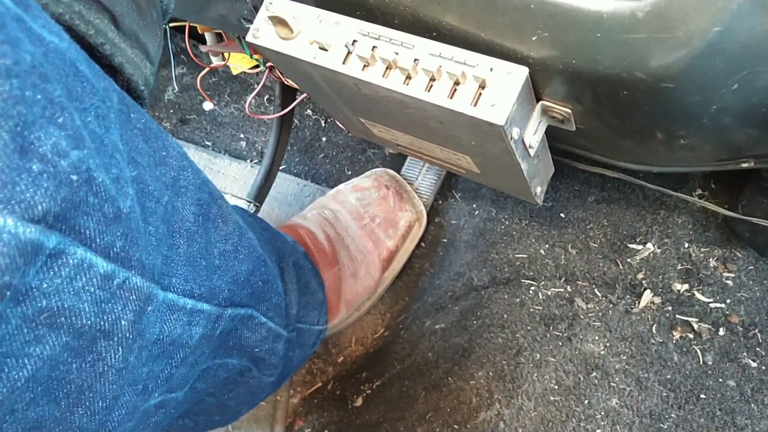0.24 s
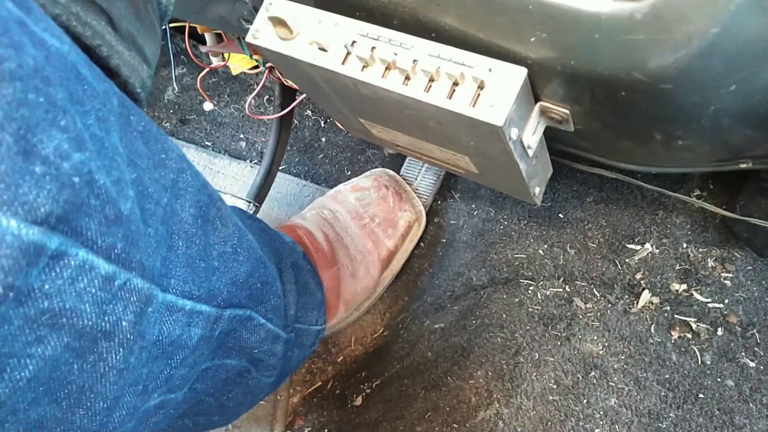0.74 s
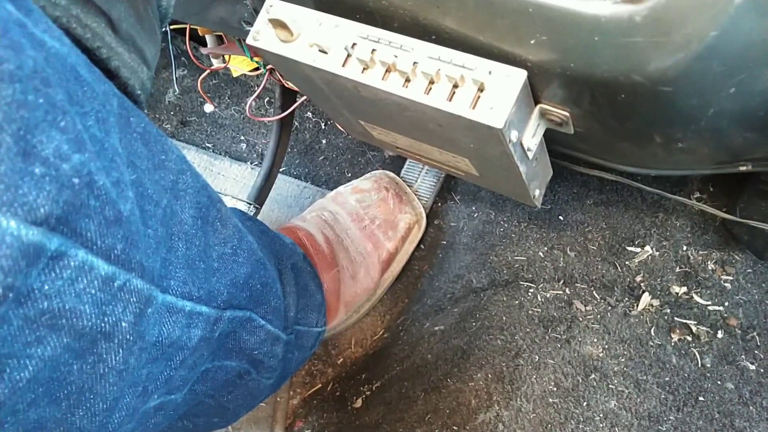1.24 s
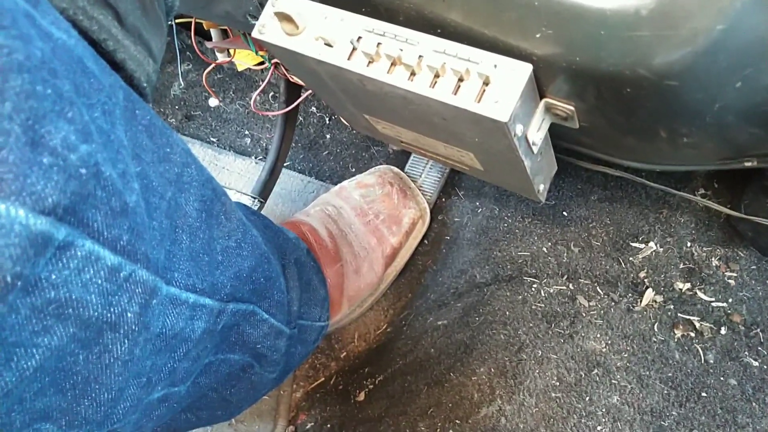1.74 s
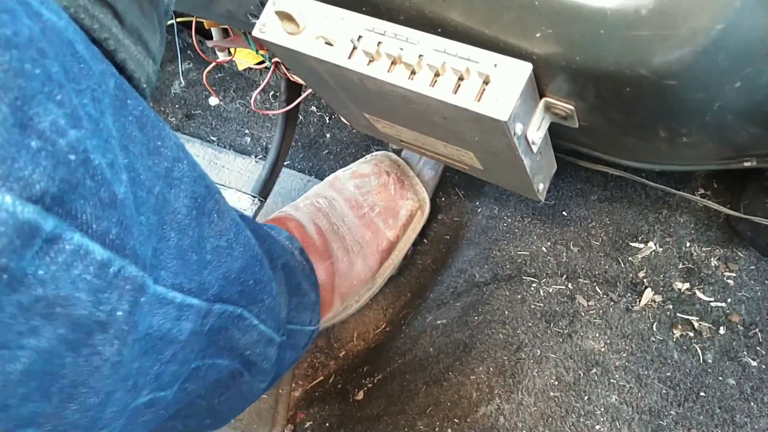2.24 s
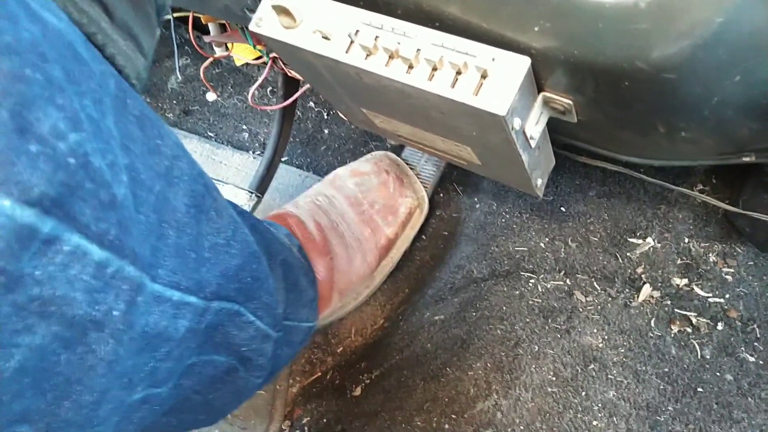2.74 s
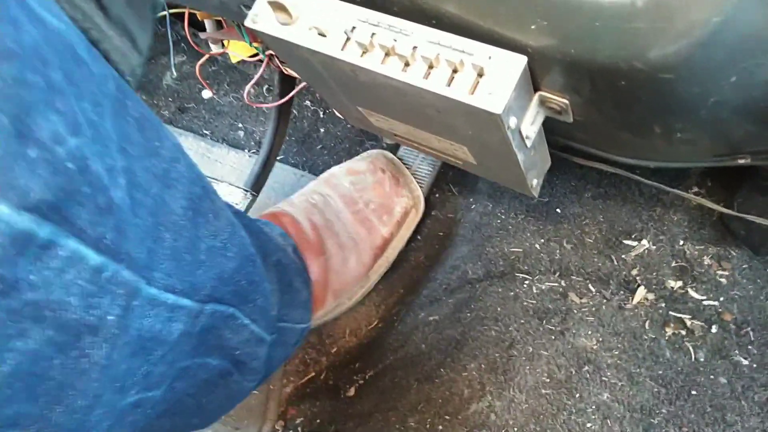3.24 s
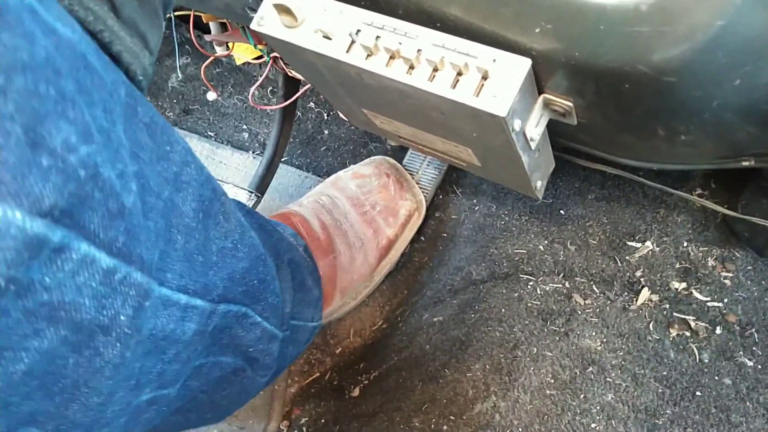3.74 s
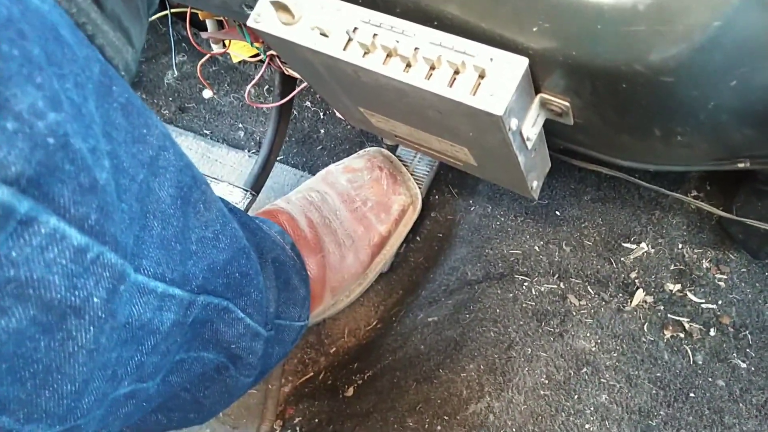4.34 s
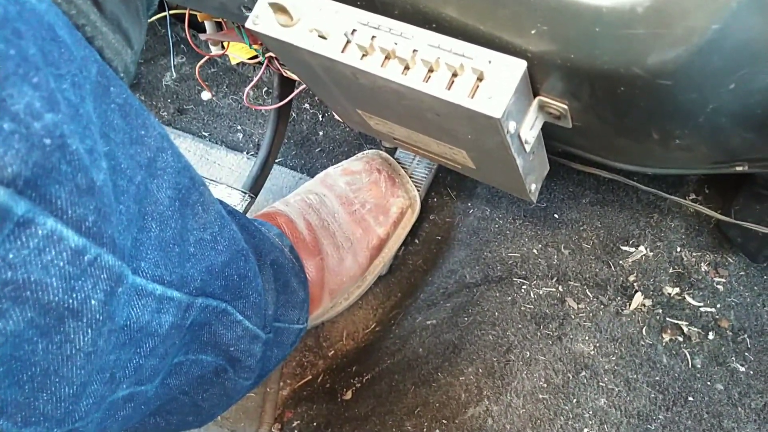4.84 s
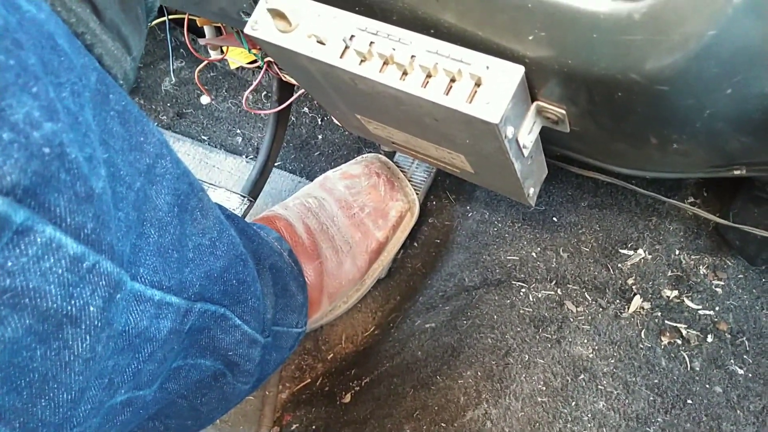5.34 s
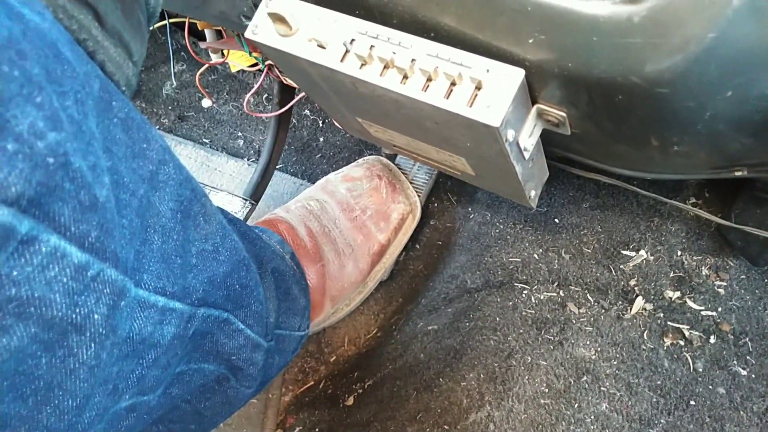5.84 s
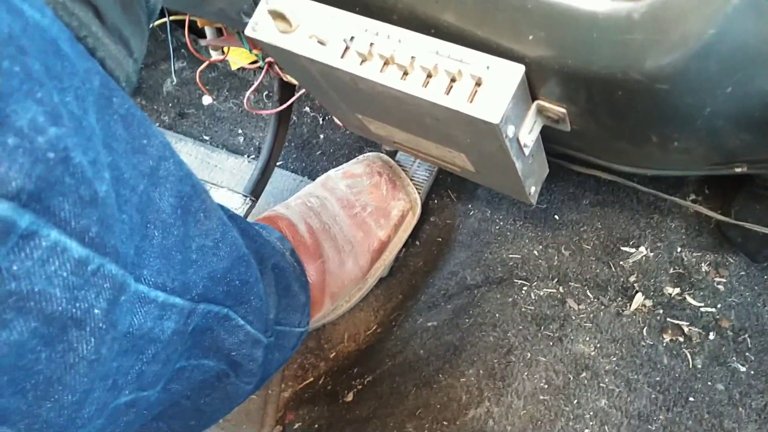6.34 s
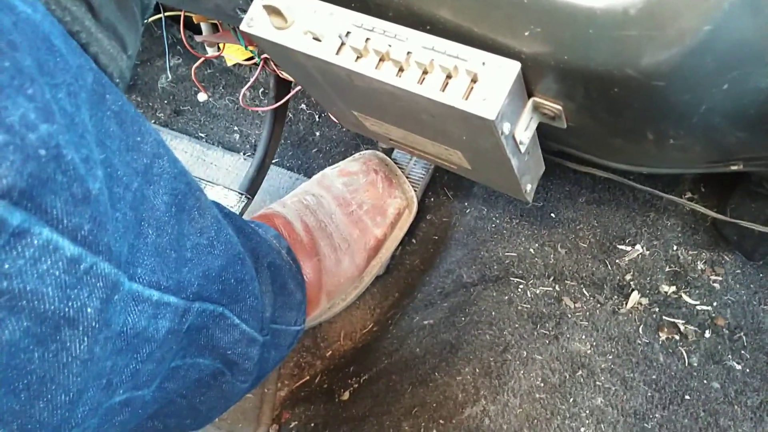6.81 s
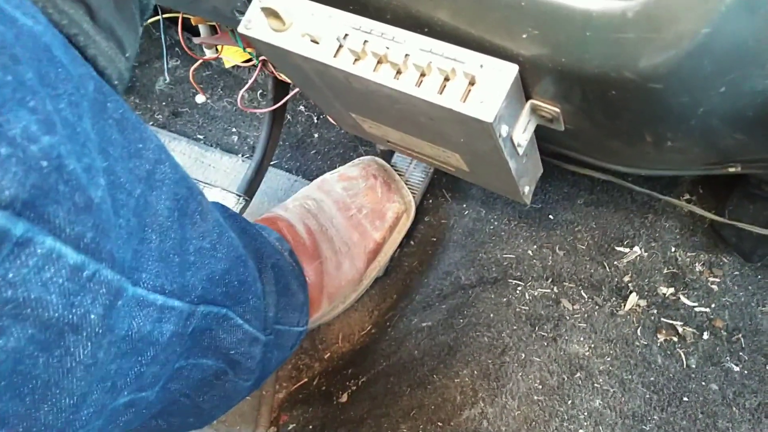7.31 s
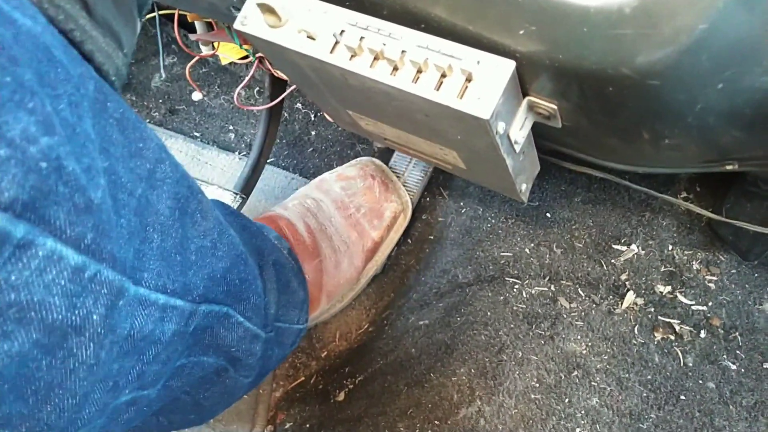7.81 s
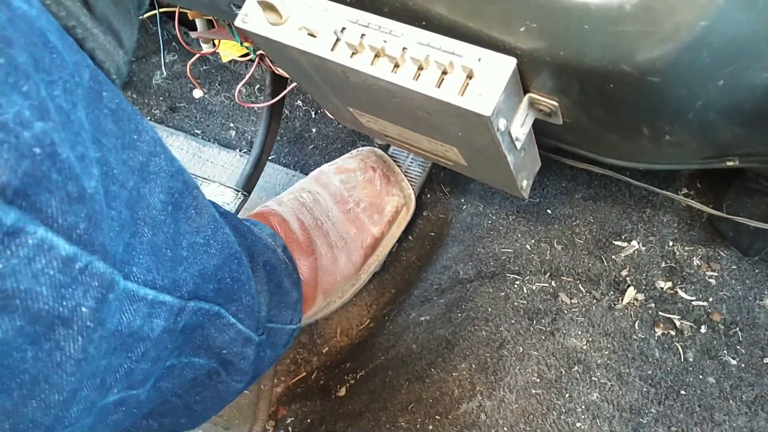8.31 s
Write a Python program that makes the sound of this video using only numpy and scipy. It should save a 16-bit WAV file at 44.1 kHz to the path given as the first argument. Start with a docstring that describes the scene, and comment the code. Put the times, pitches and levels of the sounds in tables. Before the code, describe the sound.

Dry, close sound inside a truck cab, with faint low hum and air hiss throughout. From 0 to about 2 seconds a starter grinds a cold engine: rough metallic whine and rasp, jingling loose parts, irregular surges and slams, deep wavering boom through the cab. It lets go near 2.1. Until 3.9, a boot pumps the pedal with dull, soft floor knocks, strongest around 2.85, 3.1 and 3.4, with tiny key ticks and linkage rustles. A quiet gap follows. At 4.58 the solenoid clicks sharply; at 4.7 the pinion clanks into mesh and grinding resumes, lumpy and labouring. A heavy kick lands at 5.8. From 6.05 to 7.5 the engine coughs in irregular muffled low thumps, the grind brighter and harsher. Around 7.4 the starter releases, its thin high hiss pulsing slower and fading while the boom dies. A faint knock at 8.2, then near quiet to 8.5.

```python
"""Cold engine cranked, heard in a truck cab

The starter grinds a cold engine over and lets go, a boot pumps the pedal, the solenoid clicks and the
starter grinds again; the engine coughs and the starter spins down. Gear: noise in housing resonances.
Cab boom: wavering tones and resonant noise. Knocks, coughs, clicks: struck decaying modes.
Hum, air hiss, scrapes, firewall drone: a tone and coloured noise.
"""
import sys
import numpy as np
from scipy import signal
from scipy.fft import rfft, irfft
from scipy.io import wavfile

SR = 44100
rng = np.random.default_rng(int(sys.argv[2]) if len(sys.argv) > 2 else 0)


def output_pcm(signal):
    """Save a mono or channel-first signal as 16-bit PCM at the path in sys.argv[1].

    Samples are clipped to [-1, 1] before scaling.
    """
    pcm = np.clip(np.atleast_2d(signal).T, -1, 1) * 32767
    wavfile.write(sys.argv[1], SR, np.round(pcm).astype(np.int16))


N = 377937

# Air hiss spectrum: f/Hz, relative density/dB
AIR_SPECTRUM = [(47, -22), (80, -6.5), (170, -25), (1020, -33.5), (1730, -31.5), (2690, -37), (4000, -39),
                (5700, -45.5), (15800, -43)]
AIR_DB = -47
HUM_HZ, HUM_DB = 58.4, -39.5

# Touching keys, onsets: t/s, nominal peak/dB
KEY_TICKS = [(2.242, -47), (3.075, -50), (3.097, -48), (3.57, -48)]
# Key modes: f/Hz, relative level/dB, t60/s
KEY_MODES = [(11700, 0, .07), (14300, -3, .03)]
# Pedal linkage rustles: t/s, level/dB, centre f/Hz
LINKAGE_RUSTLES = [(2.325, -50, 600), (2.57, -47, 560), (3.085, -46, 330), (3.22, -52, 800),
                   (3.295, -55, 3300), (3.515, -45, 440)]

# Floor pan knocks from pedal and shaking:
# t/s, nominal level/dB, upper ring re level/dB, nominal rattle re level/dB
FLOOR_KNOCKS = [(2.057, -29, -18, -11), (2.277, -26, -13, -12), (2.35, -22, -22, -32),
                (2.608, -24, -22, -30), (2.854, -17.5, -20, -23), (3.117, -18, -22, -27),
                (3.285, -29, -24, -22), (3.409, -13.5, -24, -29), (3.703, -23.5, -24, -28),
                (3.857, -24, -24, -23), (6.902, -20, -22, -23), (7.464, -28, -17, -8),
                (8.179, -29, -24, -24)]
# Floor pan, deep modes: f/Hz, relative level/dB, t60/s
PAN_LOW_MODES = [(124, -9, .07), (163, -3, .2), (184, 2, .25)]
# Floor pan, upper modes: f/Hz, relative level/dB, t60/s
PAN_HIGH_MODES = [(245, 12, .08), (305, 15, .06), (440, 7, .06), (555, 5, .09), (800, 2, .05)]
# Linkage rattle and sole scuff spectra: f/Hz, relative density/dB
RATTLE_SPECTRUM = [(300, -17.0), (600, 0.5), (2000, -1.5), (3500, -12.5), (6000, -21), (15000, -18)]
SCUFF_SPECTRUM = [(150, 15.5), (320, 5.0), (700, -9), (1800, -19)]
SCUFF_RE_KNOCK_DB, SCUFF_LEAD_S = -25, 0.042

# Key and solenoid clicks: t/s, nominal level/dB
SOLENOID_CLICKS = [(4.543, -31.5), (4.578, -13), (4.587, -21)]
# Solenoid modes: f/Hz, relative level/dB, t60/s
SOLENOID_MODES = [(520, -16, .1), (880, 0, .1), (1394, -4, .09), (2013, 2, .06), (2900, -4, .08),
                  (3170, 9, .055), (3400, -1, .06), (4000, -2, .06), (5070, -5, .06)]
# Solenoid scrape spectrum: f/Hz, relative density/dB
SOLENOID_SCRAPE_SPECTRUM = [(400, 7), (3000, 7.0), (7000, 3.0), (15000, -16)]
MESH_S, MESH_DB = 4.702, -16
# Ring gear modes: f/Hz, relative level/dB, t60/s
RING_GEAR_MODES = [(830, -7, .04), (1920, 0, .05), (2940, -5, .05)]

# Engine kicks against its mounts: t/s, nominal peak/dB
ENGINE_KICKS = [(1.235, -25), (4.704, -22.5), (5.798, -17), (6.962, -21)]
# Firewall modes: f/Hz, relative level/dB, t60/s
FIREWALL_MODES = [(243, 0, .09), (645, -15, .05)]
# Catching cylinders: t/s, nominal level/dB before the low-pass
CYLINDER_COUGHS = [(6.054, -21), (6.192, -7), (6.492, -13), (6.619, -10.5), (6.809, -5), (6.959, -17),
                   (7.102, -17), (7.39, -12), (7.479, -13)]
# Exhaust thump through the body: f/Hz, relative level/dB, t60/s
THUMP_MODES = [(52.3, -10.5, 0.19), (94.5, -10, 0.18), (136, -18, 0.099)]

# Cab shaking: t/s, low boom level/dB, upper boom level/dB
CAB_SHAKE = [(0, -25, -29), (0.4, -33.5, -28.5), (0.72, -29, -27), (0.85, -23, -36.5), (1.2, -32, -23.5),
             (1.97, -28, -28), (2.12, -33, -47), (2.5, -43, -44.5), (3, -37.5, -49), (3.9, -44, -46.5),
             (4.1, -68, -91), (4.69, -48, -32), (4.72, -30.5, -18.5), (5.6, -36, -35), (5.9, -23.5, -34),
             (6.2, -22, -32.5), (7.05, -22, -26.5), (7.26, -22, -25.5), (7.58, -23.5, -28),
             (7.7, -38.5, -32.5), (8.56, -44, -39)]
# Cab air and body, low: f/Hz, width/Hz, relative level/dB
LOW_BOOM_MODES = [(39, 6, -9.5), (49.5, 13.2, -17.5)]
# Cab air and body, upper: f/Hz, width/Hz, relative level/dB
HIGH_BOOM_MODES = [(68.2, 12, 5), (102.6, 14, -6)]
CAB_TONE_HZ, UPPER_TONE_HZ = 46.53, 70.74
# Engine block through the firewall: f/Hz, relative density/dB
DRONE_SPECTRUM = [(76, -22), (130, -17), (155, -10), (241, 5), (317, -7), (395, 0), (450, -8.5),
                  (843, -2.5), (1100, -5.5), (1690, -8.5), (2340, -8), (3960, -120)]
DRONE_OFFSET_DB, DRONE_PER_GRIND, DRONE_PER_BOOM = -13.5, 0.16, 0.66  # slopes in dB per dB
PANEL_HZ, PANEL_WIDTH_HZ, PANEL_RE_DRONE_DB = 243, 22, -4

SPIN_DOWN_S, SPIN_DOWN_DB, SPIN_DOWN_DB_PER_S = 7.44, -40.5, 32
SPIN_TICKS_PER_S, SPIN_SLOWING_PER_S = 33, 0.46  # initial pulse rate and its exponential decay
# Spin-down hiss spectrum: f/Hz, relative density/dB
SPIN_SPECTRUM = [(5000, -24), (6500, -8), (8000, -6), (9800, 2), (11000, -9), (11800, 4),
                 (12600, -8), (15800, -4)]

# Starter gear between strokes: t/s, level/dB, treble re body/dB
GEAR_GRIND = [(0, -33.5, -5.5), (1.97, -35, -4.5), (2.12, -73.5, 13), (4.66, -64, 3), (4.73, -38, -8),
              (4.95, -37, -9), (5.6, -34.5, -4), (6.2, -27.5, 0.5), (6.45, -32.5, 1.5), (7.05, -28.5, -1),
              (7.26, -34.5, 1.5), (7.31, -47, 6), (7.6, -53.5, 3), (8.56, -67, 6.5)]
# Compression strokes and sharp jolts loading the gear; rows rising in 0.01 s or less are jolts: t/s of peak,
# level/dB, rise/s
STROKES_AND_JOLTS = [(0.191, -26.5, 0.045), (0.319, -40.5, 0.057), (0.394, -32, 0.02),
                     (0.662, -31, 0.024), (0.908, -34.5, 0.02), (1.06, -30.5, 0.083),
                     (1.183, -34.5, 0.087), (1.244, -31, 0.02), (1.504, -29.5, 0.035),
                     (1.937, -31.5, 0.055), (4.702, -25, 0.01), (4.79, -36.5, 0.038), (4.881, -34, 0.056),
                     (5.272, -32.5, 0.07), (5.494, -35.5, 0.079), (5.675, -30.5, 0.047),
                     (5.751, -38, 0.057), (5.884, -36.5, 0.12), (5.937, -36.5, 0.012),
                     (6.112, -41, 0.029), (6.426, -32.5, 0.012), (6.634, -33, 0.052), (6.954, -24, 0.008),
                     (7.01, -30.5, 0.0079), (7.26, -37.5, 0.045)]
STROKE_FALL_S = 0.022
# Pinion slams across its backlash: t/s of onset, level/dB
PINION_SLAMS = [(0.087, -24), (1.85, -24.5), (1.006, -32), (1.624, -36), (2.034, -39), (5.794, -26.5),
                (7.36, -43.5), (7.441, -43), (7.469, -40)]
SLAM_RISE_S, SLAM_FALL_S = 0.014, 0.0091
# Gear housing resonances: f/Hz, width/Hz, relative level/dB
HOUSING_MODES = [(860, 23, -4.5), (1389, 17.3, -0.5), (1600, 77, -8), (1738, 35, 1), (1946, 41, 0.5),
                 (2129, 33.4, 7), (2257, 25, 0.5), (2724, 25, -6.5), (2908, 38, 0.5), (3118, 51, -1.5),
                 (3325, 73, 0.5), (3603, 50, -1.5), (4068, 68, -2.5)]
# Broad tooth scrape: f/Hz, relative density/dB
SCRAPE_SPECTRUM = [(700, -37), (1300, -18), (2150, 8.5), (2550, -29.5), (3300, -20), (4500, -2),
                   (5300, -15), (6000, -3), (7000, -6), (7700, -14.5), (9800, -8.5), (11000, -21),
                   (11900, -5.5), (13400, -26), (15900, -15.5)]
TOOTH_HITS_PER_S, TOOTH_HIT_DB = 90, 20  # per resonance; gain added to its noise
WHINE_WAVER = .005  # rms share of pitch
TREBLE_EDGES_HZ = 5250, 6500, 7800, 9200, 11000, 13000, 16500
JINGLES_PER_S, JINGLE_CYCLES, JINGLE_RE_BODY_DB = 1000, 200, -9  # loose parts; cycles to -60 dB
BUZZES_PER_S, BUZZ_CYCLES, BUZZ_RE_BODY_DB = 500, 80, -12  # sheet metal

STOPBAND_HZ = 15880


def from_db(db):
    """Amplitude gain of a level in dB."""
    return 10 ** (np.asarray(db) / 20)


def rms_one(x):
    """Scale to rms 1."""
    return x / np.sqrt(np.mean(x ** 2) + 1e-20)


def in_time(rows):
    """Table columns as linear curves, one value a sample."""
    s, *columns = np.transpose(rows)
    t = np.arange(N) / SR
    return [np.interp(t, s, c, left=c[0], right=c[-1]) for c in columns]


def drift(corner_hz):
    """Random walk-like curve, rms 1: noise through two equal poles, run at SR / 40."""
    r = np.exp(-80 * np.pi * corner_hz / SR)
    noise = rng.standard_normal(N // 40 + 2002)
    slow = rms_one(signal.lfilter([1], [1, -2 * r, r * r], noise)[2000:])  # settled part
    return np.interp(np.arange(N) / 40, np.arange(len(slow)), slow)


def band_pass(x, order, edges_hz):
    """Butterworth band-pass."""
    return signal.sosfilt(signal.butter(order, edges_hz, "band", fs=SR, output="sos"), x)


def low_pass(x, order, hz):
    """Butterworth low-pass."""
    return signal.sosfilt(signal.butter(order, hz, fs=SR, output="sos"), x)


def coloured_noise(spectrum):
    """Noise of rms 1 with a spectrum linear in dB over log f; -90 dB beyond its ends."""
    hz, db = np.transpose(spectrum)
    log_hz = np.log(np.maximum(np.arange(N // 2 + 1) * SR / N, 1))
    gain = from_db(np.interp(log_hz, np.log(hz), db, left=-90, right=-90))
    return rms_one(irfft(rfft(rng.standard_normal(N)) * gain, N))


def wavering(hz, waver_hz, corner_hz):
    """Sine of rms 1 whose pitch wanders by waver_hz rms."""
    cycles = np.cumsum(hz + waver_hz * drift(corner_hz)) / SR
    return np.sqrt(2) * np.sin(2 * np.pi * cycles)


def resonant(modes, flicker_db, hits_per_s=0, hit_db=0):
    """Noise with scattered hard hits drives each resonance, each flickering by itself; rms 1."""
    out = 0
    for hz, width_hz, db in modes:
        r = np.exp(-np.pi * max(width_hz, 2) / SR)
        hits = rng.random(N) < hits_per_s / SR
        drive = rng.standard_normal(N) * (1 + from_db(hit_db) * hits)
        poles = [1, -2 * r * np.cos(2 * np.pi * hz / SR), r * r]
        band = signal.lfilter([1, 0, -1], poles, drive) * (1 - r * r)
        out = out + from_db(db + flicker_db * drift(7.8)) * band
    return rms_one(out)


def struck(modes, times, peak_db, spread_db, bounce_s):
    """Each blow lands twice, second at half amplitude; mode strengths vary from blow to blow."""
    at, out = np.round(times * SR).astype(int), np.zeros(N)
    luck = rng.standard_normal((len(at), len(modes)))
    for k, (hz, db, t60_s) in enumerate(modes):
        clicks = np.full(N, 1e-18)  # floor avoids denormals
        clicks[at] = from_db(peak_db + db + spread_db * luck[:, k])
        clicks[at + round(bounce_s * SR)] = .5 * clicks[at]
        r, w = from_db(-60 / (t60_s * SR)), 2 * np.pi * hz / SR
        out += signal.lfilter([0, np.sin(w)], [1, -2 * r * np.cos(w), r * r], clicks)
    return out


def bursts(times, peak_db, rise_s, fall_s):
    """Envelope of quick swells with exponential decay, each cut at 0.25 s."""
    out, t = np.zeros(N), np.arange(SR // 4) / SR
    shape = (1 - np.exp(-t / rise_s)) * np.exp(-t / fall_s)
    shape /= shape.max()
    for s, db in zip(times, peak_db):
        i = round(s * SR)
        out[i:i + len(t)] += from_db(db) * shape[:N - i]
    return out


def jingles(per_s, cycles, low_hz, high_hz):
    """Random touches, each ringing one of 30 pitches for a set number of cycles; rms 1."""
    touches = rng.random(N) < per_s / SR
    sizes = from_db(4.5 * np.minimum(rng.exponential(1, N), 4)) * touches
    dealt, out = rng.integers(0, 30, N), 0
    for k, hz in enumerate(np.geomspace(low_hz, high_hz, 30)):
        r, w = from_db(-60 * hz / (cycles * SR)), 2 * np.pi * hz / SR
        drive = np.sin(w) * sizes * (dealt == k) + 1e-18
        gain = (hz / low_hz) ** -.1
        out = out + signal.lfilter([gain], [1, -2 * r * np.cos(w), r * r], drive)
    return rms_one(out)


def background():
    """Slightly wavering hum over smooth air hiss."""
    hum = from_db(HUM_DB + 1.1 * drift(24)) * wavering(HUM_HZ, waver_hz=0.25, corner_hz=1.8)
    return hum + from_db(AIR_DB + .6 * drift(4)) * coloured_noise(AIR_SPECTRUM)


def keys():
    """Keys touch and ring at high modes."""
    return struck(KEY_MODES, *np.transpose(KEY_TICKS), spread_db=4, bounce_s=.003)


def rustles():
    """Pedal linkage scrapes: short noise bursts, each in its own band."""
    out, noise = 0, rng.standard_normal(N)
    for s, db, hz in LINKAGE_RUSTLES:
        band = rms_one(band_pass(noise, 2, [hz / 1.25, hz * 1.25]))
        out = out + band * bursts([s], [db], rise_s=.01, fall_s=0.017)
    return out


def knocks():
    """Soft blows ring the floor pan; the sole drags ahead of each and loose linkage rattles."""
    times, peak_db, upper_db, rattle_db = np.transpose(FLOOR_KNOCKS)
    rings = struck(PAN_LOW_MODES, times - .002, peak_db - 6, spread_db=1.5, bounce_s=.0052)
    rings += struck(PAN_HIGH_MODES, times + .002, peak_db + upper_db, spread_db=2, bounce_s=0.0035)
    soft = band_pass(rings, 2, [85, 500])  # rubber sole
    scuff_env = bursts(times - SCUFF_LEAD_S, peak_db + SCUFF_RE_KNOCK_DB, rise_s=0.046, fall_s=0.067)
    scuff = coloured_noise(SCUFF_SPECTRUM) * scuff_env
    rattle_env = bursts(times - .006, peak_db + rattle_db - 1.0, rise_s=0.0048, fall_s=0.022)
    rattle = coloured_noise(RATTLE_SPECTRUM) * from_db(1.55 * drift(87)) * rattle_env
    return soft + scuff + rattle


def solenoid():
    """The solenoid snaps home: struck modes and a short scrape."""
    times, peak_db = np.transpose(SOLENOID_CLICKS)
    ring = struck(SOLENOID_MODES, times, peak_db - 16, spread_db=3, bounce_s=.0038)
    scrape_env = bursts(times, peak_db - 15, rise_s=0.002, fall_s=0.014)
    return ring + coloured_noise(SOLENOID_SCRAPE_SPECTRUM) * scrape_env


def pinion_mesh():
    """The pinion bites into the ring gear and its modes clank."""
    return struck(RING_GEAR_MODES, np.array([MESH_S]), MESH_DB, spread_db=1, bounce_s=.0026)


def engine_kicks():
    """The engine kicks against its mounts and rings the firewall."""
    return struck(FIREWALL_MODES, *np.transpose(ENGINE_KICKS), spread_db=1.5, bounce_s=.004)


def coughs():
    """A catching cylinder sends a soft low thump through the body."""
    times, peak_db = np.transpose(CYLINDER_COUGHS)
    return low_pass(struck(THUMP_MODES, times, peak_db, spread_db=0.5, bounce_s=0.0021), 2, 200)


def cab_boom(low_db, high_db):
    """The shaking engine rings the deepest cab resonances: wavering tones plus resonant noise."""
    low_tone = from_db(-1.5 + 2.5 * drift(4)) * wavering(CAB_TONE_HZ, waver_hz=1.6, corner_hz=5)
    low_noise = from_db(0.5) * resonant(LOW_BOOM_MODES, flicker_db=0.5)
    high_tone = from_db(-5.5 + 2.5 * drift(3.8)) * wavering(UPPER_TONE_HZ, waver_hz=4.54, corner_hz=3.3)
    high_noise = from_db(-3.0) * resonant(HIGH_BOOM_MODES, flicker_db=4.0)
    boom = from_db(low_db) * (low_tone + low_noise) + from_db(high_db) * (high_tone + high_noise)
    return band_pass(boom, 4, [34, 230])


def firewall_drone(grind_db, high_db):
    """Block noise through the firewall with a singing panel; level follows gear and upper boom."""
    drone_db = DRONE_OFFSET_DB + DRONE_PER_GRIND * grind_db + DRONE_PER_BOOM * high_db
    panel = resonant([(PANEL_HZ, PANEL_WIDTH_HZ, 0)], flicker_db=3.0)
    drone = from_db(PANEL_RE_DRONE_DB) * panel + coloured_noise(DRONE_SPECTRUM)
    return from_db(drone_db + 1.9 * drift(13)) * drone


def spin_down():
    """The released starter: thin high hiss, pulsing ever more slowly as it fades."""
    since_s = (np.arange(N) / SR - SPIN_DOWN_S).clip(0)
    turns = np.cumsum(SPIN_TICKS_PER_S * np.exp(-SPIN_SLOWING_PER_S * since_s)) / SR
    pulse_db = 2.0 * np.cos(2 * np.pi * turns)
    level = from_db(SPIN_DOWN_DB - SPIN_DOWN_DB_PER_S * since_s + pulse_db)
    onset = np.minimum(since_s / 0.0046, 1)
    return coloured_noise(SPIN_SPECTRUM) * onset * level


def load_swell():
    """Gear load envelope: compression strokes and jolts plus pinion slams."""
    t = np.arange(N) / SR
    swell = bursts(*np.transpose(PINION_SLAMS), rise_s=SLAM_RISE_S, fall_s=SLAM_FALL_S)
    for s, db, rise_s in STROKES_AND_JOLTS:
        side_s = np.where(t < s, rise_s, STROKE_FALL_S)
        swell += from_db(db) * np.exp(-abs((t - s) / side_s) ** 3.05)
    return swell


def gear_teeth():
    """Teeth scrape as rough hiss and ring the housing; the whole whine wavers slightly in pitch."""
    whine = resonant(HOUSING_MODES, flicker_db=2.5, hits_per_s=TOOTH_HITS_PER_S, hit_db=TOOTH_HIT_DB)
    read_at = np.cumsum(1 + WHINE_WAVER * drift(9))  # uneven reading speed bends the pitch
    whine = np.interp(read_at, np.arange(N), whine)
    return whine + from_db(-12.5) * coloured_noise(SCRAPE_SPECTRUM)


def starter(grind_db, treble_db):
    """Gear noise, jingling parts and buzzing sheet metal swell under the load; strokes add a thud."""
    swell, gear = load_swell(), gear_teeth()
    body = rms_one(low_pass(gear, 4, TREBLE_EDGES_HZ[0]))
    bands = [band_pass(gear, 3, pair) for pair in zip(TREBLE_EDGES_HZ, TREBLE_EDGES_HZ[1:])]
    treble = rms_one(sum(from_db(2.06 * drift(30)) * band for band in bands))  # bands flare singly
    treble *= from_db(treble_db + 0.5 * drift(33))
    jingle = jingles(JINGLES_PER_S, JINGLE_CYCLES, low_hz=2528, high_hz=12840)
    buzz = jingles(BUZZES_PER_S, BUZZ_CYCLES, low_hz=548.8, high_hz=2299)
    loose = from_db(JINGLE_RE_BODY_DB) * jingle + from_db(BUZZ_RE_BODY_DB) * buzz
    load = (from_db(grind_db) + swell) * from_db(1.82 * drift(31))  # teeth catch unevenly
    thud = rms_one(band_pass(rng.standard_normal(N), 2, [500, 1500]))
    return load * (body + treble + loose) + swell * from_db(-12.0) * thud


def scene():
    """Sum of all sources, one channel."""
    grind_db, treble_db = in_time(GEAR_GRIND)
    low_db, high_db = in_time(CAB_SHAKE)
    out = background() + keys() + rustles() + knocks() + solenoid() + pinion_mesh()
    out += engine_kicks() + coughs() + cab_boom(low_db, high_db) + firewall_drone(grind_db, high_db)
    out += spin_down() + starter(grind_db, treble_db)
    return out[None]


def record(dry):
    """Steep low-pass, 55 dB down from the stopband edge."""
    return signal.sosfilt(signal.cheby2(30, 55, STOPBAND_HZ, fs=SR, output="sos"), dry)


dry = scene()
out = record(dry)
output_pcm(out)
```